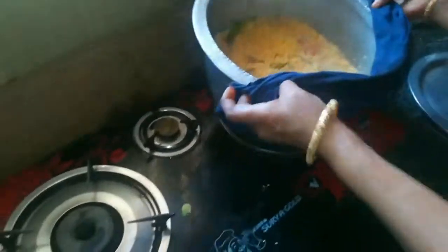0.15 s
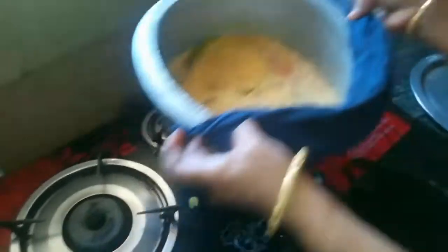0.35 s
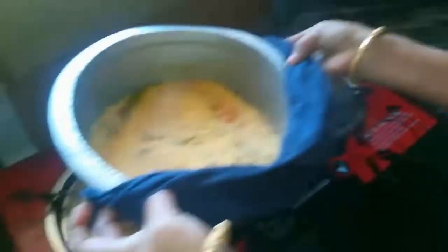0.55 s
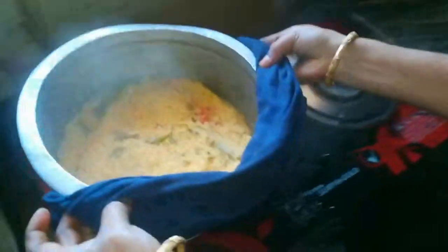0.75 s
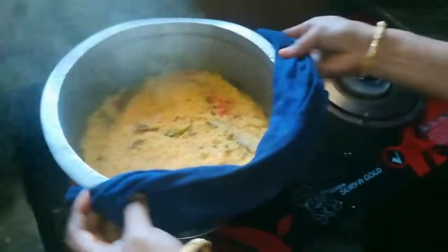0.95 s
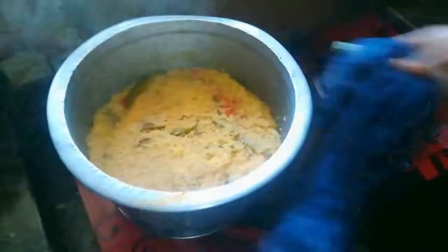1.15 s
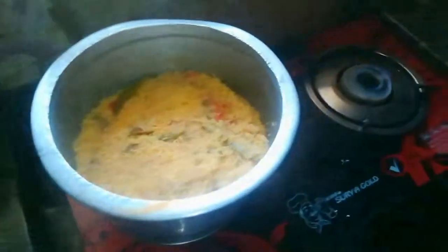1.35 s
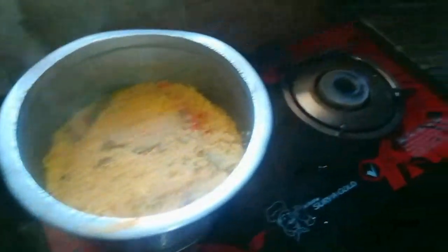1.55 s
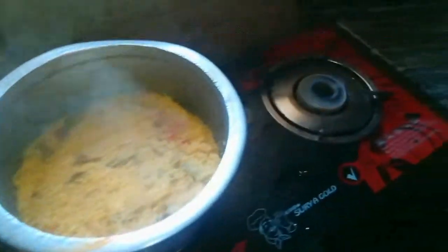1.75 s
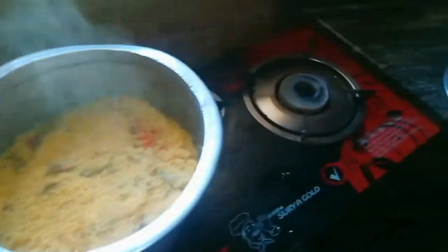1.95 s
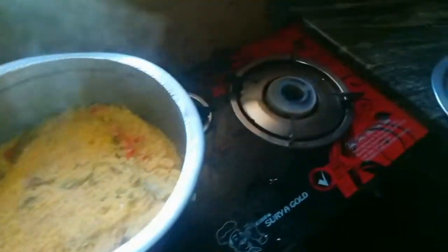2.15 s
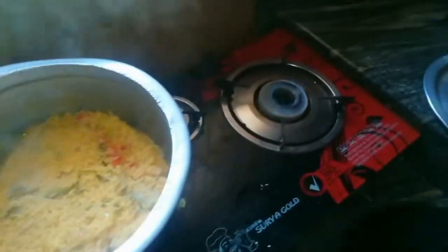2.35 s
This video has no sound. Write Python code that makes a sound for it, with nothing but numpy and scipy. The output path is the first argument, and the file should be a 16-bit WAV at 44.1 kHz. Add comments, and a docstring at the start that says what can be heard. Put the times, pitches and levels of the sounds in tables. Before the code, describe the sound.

Loud metallic clanks as a full metal pot leaves a gas burner, then a short squealing scrape

```python
"""Clanks: a full metal pot is lifted off a gas burner and the iron pan support drops back on the stove top.
Decaying sines ring the support and stove top; decaying noise bands give the crack and sheet-metal clatter.
The pot then slides onto the next burner: noise-driven resonators scrape, gliding sines squeal, low modes bump.
The kitchen is small and hard-walled (noise reverberation), with soft air noise and a low motor hum.
The loudest clanks overload the microphone (soft clipping)."""
import sys
import numpy as np
from scipy import signal
from scipy.fft import rfft, irfft
from scipy.io import wavfile

SR = 44100
rng = np.random.default_rng(int(sys.argv[2]) if len(sys.argv) > 2 else 0)


def transcribe(u):
    """Save the signal u as a 16-bit wav file named by the first command-line argument.

    u: samples, shape (n,) or (channels, n), limited to [-1, 1]; the rate is SR.
    q: integer samples, one column per channel.
    """
    v = np.clip(np.atleast_2d(u).T, -1, 1)
    q = np.round(v * 32767).astype(np.int16)
    wavfile.write(sys.argv[1], SR, q)


N = 110250
T = np.arange(N) / SR
EARS = np.array([[1], [-1]])  # left, right

# support strikes stove: t/s, clatter level/dB, extra bass/dB, extra treble/dB, support ring/dB, stove ring/dB
CLANKS = [(0.234, -9.5, -15, 2, -15, -16), (0.244, -6, -2, -1, -1, -7), (0.2907, -12, 0.5, 5.5, -20, -7.5),
          (0.301, -15.5, -4, -1, -2, -26), (0.432, -12.5, 5.5, 3, -22, -5),
          (0.588, -25.5, 5.5, -49, -23.5, -26)]
# grinding spectrum of the sliding contact: f/Hz, relative density/dB per Hz
GRIND = [(400, 2), (2100, -13.5), (3300, 2.5), (5400, 1), (7500, 0.5), (10200, -3.5), (12400, -21),
         (15500, -41)]
# stereo image: f/Hz, left-right likeness (-1 to 1), left-right level/dB
STEREO = [(102, .99, 0.5), (284, 0.96, -1), (580, 0, 0), (980, 0.6, 0), (2770, 0, -5.5), (4500, 0, -3.5),
          (8000, 0.078, -2), (14000, 0, 0.5)]

POT_T60_S = 0.067
JUDDER_DB, JUDDER_HZ = 1.5, 83  # rms and corner of the uneven friction
STOVE_ROOM_DB, SCRAPE_ROOM_DB = -13.5, -6.5


def from_db(db):
    """Decibels to gain."""
    return 10 ** (np.asarray(db) / 20)


def rms_one(x):
    """Scale to unit rms."""
    return x / np.sqrt(np.mean(x ** 2) + 1e-20)


def at_hz(table, hz, axis=1):
    """Read one column of a table on a log-frequency axis."""
    table = np.array(table)
    return np.interp(np.log(hz), np.log(table[:, 0]), table[:, axis])


def pan(db):
    """Left and right gains for a level difference."""
    return from_db(EARS * db / 2)


def decay(start_s, t60_s):
    """Unit step at start_s, falling 60 dB in t60_s."""
    return (T >= start_s) * np.exp(-np.log(1000) * np.maximum(T - start_s, 0) / t60_s)


def drift(corner_hz):
    """Random wander of unit rms, its spectrum falling above the corner."""
    spectrum = rfft(rng.standard_normal(N))
    rolloff = 1 + (np.fft.rfftfreq(N, 1 / SR) / corner_hz) ** 2
    return rms_one(irfft(spectrum / rolloff, N))


def ring(x, hz, t60_s):
    """Two-pole resonator: a unit click starts a decaying sine of height 1."""
    radius = np.exp(-np.log(1000) / (t60_s * SR))
    w = 2 * np.pi * hz / SR
    return signal.lfilter([0, np.sin(w)], [1, -2 * radius * np.cos(w), radius ** 2], x + 1e-18)


def butter(x, edges_hz, kind):
    """Second-order Butterworth filter."""
    return signal.sosfilt(signal.butter(2, edges_hz, kind, fs=SR, output="sos"), x)


def bands(spectrum, drive=1):
    """Driven stereo noise in narrow bands, as (Hz, band); a drive of 1 gives rms 1 in all."""
    edges_hz = np.geomspace(20, 16000, 28)
    centres_hz = np.sqrt(edges_hz[1:] * edges_hz[:-1])
    white = rng.standard_normal((2, 2, N)) * drive
    gains = from_db(at_hz(spectrum, centres_hz))
    gains = gains / np.sqrt(np.sum(gains ** 2 * np.diff(edges_hz)) * 2 / SR)
    for k, hz in enumerate(centres_hz):
        # neighbouring bands use different noise
        mid, side = butter(white[k % 2] + 1e-18, edges_hz[k:k + 2], "band")
        alike = np.clip(at_hz(STEREO, hz), -1, 1)
        stereo = np.sqrt((1 + alike) / 2) * mid + np.sqrt((1 - alike) / 2) * side * EARS
        yield hz, gains[k] * pan(at_hz(STEREO, hz, axis=2)) * stereo


def kitchen(x):
    """Dense wall reflections: decaying noise, alike in both ears only in the bass."""
    onset_s, t60_s = 0.0059, 0.35
    mid, side = rng.standard_normal((2, N)) * decay(onset_s, t60_s)
    side = butter(side, 450, "high")
    echoes = rms_one(mid + side * EARS) / np.sqrt(N)
    return signal.fftconvolve(x, echoes, axes=1)[:, :N]


def air():
    """Steady kitchen noise: random bands, each flickering in level."""
    # f/Hz, relative density/dB per Hz
    air_spectrum = [(25, -23), (45, 0), (65, -11.5), (110, 6), (160, -7.5), (250, -5), (400, -11.5),
                    (700, -15.5), (1300, -13.5), (2200, -17.5), (3500, -19.5), (6000, -26.5),
                    (10000, -35.5), (15000, -43.5)]
    level_db, flicker_db = -32.5, 1.57
    return from_db(level_db) * sum(band * from_db(flicker_db * drift(15)) for _, band in bands(air_spectrum))


def rushing_tones():
    """Faint narrow-band noise: slow random amplitudes on a cosine and a sine."""
    # f/Hz, drift corner/Hz, rms level/dB
    tones = [(105.9, 4.7, -37.5), (236.6, 25, -42), (1349, 25, -44.5)]
    out = 0
    for hz, width_hz, db in tones:
        in_phase = drift(width_hz) * np.cos(2 * np.pi * hz * T)
        quadrature = drift(width_hz) * np.sin(2 * np.pi * hz * T)
        out = out + from_db(db) * (in_phase + quadrature)
    return out


def motor_hum():
    """Lines of the motor and the mains, wavering in level and phase."""
    # f/Hz, rms level before waver/dB
    lines = [(45.8, -49), (91.5, -29.5), (100, -41.5)]
    waver_db, waver_rad = 2, 0.13
    out = 0
    for hz, db in lines:
        level = np.sqrt(2) * from_db(db + waver_db * drift(15.0))
        out = out + level * np.sin(2 * np.pi * hz * T + waver_rad * drift(9.2))
    return out


def background():
    """Soft rushing noise and the wavering hum of a motor."""
    return air() + rushing_tones() + motor_hum()


def bumps():
    """The loaded pot bumps on the burner: soft, heavy contacts wake only the low modes."""
    # t/s, click level before low-pass/dB
    contacts = [(0.433, -18.5), (0.589, -31), (1.752, -30), (2.085, -28.5), (2.266, -34.5)]
    # f/Hz, relative level/dB, t60/s
    low_modes = [(163, 0.5, 0.28), (226.2, 0, 0.4), (287, 4, 0.18), (452, -4.5, 0.38)]
    clicks = np.zeros(N)
    for start_s, db in contacts:
        clicks[int(start_s * SR)] = from_db(db)
    clicks = butter(clicks + 1e-18, 600, "low")
    out = pan(0) * sum(from_db(db) * ring(clicks, hz, t60_s) for hz, db, t60_s in low_modes)
    return out + from_db(STOVE_ROOM_DB) * kitchen(out)


def squeals():
    """Friction locks onto a pot mode: a sine swells fast, wavers in pitch and level, and rings out."""
    # t/s, length/s, f/Hz, rms level before judder/dB, left-right level/dB
    locked_modes = [(1.682, 0.035, 3330, -35, -15), (1.748, 0.028, 1667, -24.5, 12),
                    (1.745, 0.037, 7400, -31, 9), (1.744, 0.014, 9840, -35.5, 18),
                    (1.752, 0.1, 3450, -29.5, -5), (1.822, 0.0082, 4780, -24.5, -8),
                    (1.823, 0.097, 3380, -32, -4), (1.841, 0.077, 2787, -31.5, -9),
                    (1.858, 0.042, 3670, -25.5, -1), (1.866, 0.02, 4740, -24.5, -10),
                    (1.977, 0.04, 3257, -39, -3), (1.98, 0.018, 6740, -43, -9)]
    attack_s, t60_s = 0.0023, 0.083
    waver_ratio, waver_hz = 0.0035, 50
    out = 0
    for start_s, length_s, hz, db, pan_db in locked_modes:
        end_s = start_s + length_s
        attack = np.clip((T - start_s) / attack_s, 0, 1)
        envelope = attack * ((T < end_s) + decay(end_s, t60_s))
        phase = 2 * np.pi * np.cumsum(hz * (1 + waver_ratio * drift(waver_hz))) / SR
        level = np.sqrt(2) * from_db(db + JUDDER_DB * drift(JUDDER_HZ))
        out = out + pan(pan_db) * level * envelope * np.sin(phase)
    return out


def overtones(drive, count):
    """Many weak, close pot modes over the treble, driven by separate noise on each side."""
    spread_db = 6.5
    pitches_hz = np.linspace(2515, 14410, count)
    pitches_hz = pitches_hz + (pitches_hz[1] - pitches_hz[0]) * (rng.random(count) - .5)
    gains = from_db(at_hz(GRIND, pitches_hz) + spread_db * rng.uniform(-1.2, 1, count))
    gains = rms_one(gains) / np.sqrt(count)
    # offsets the resonators' gain
    shaken = drive * rng.standard_normal((2, N)) * np.sqrt(4 * np.log(1000) / (POT_T60_S * SR))
    return sum(gain * pan(at_hz(STEREO, hz, axis=2)) * ring(shaken, hz, POT_T60_S)
               for hz, gain in zip(pitches_hz, gains))


def rubbing_force():
    """Uneven rub of the sliding pot, plus hard catches of its base on the prongs."""
    # t/s, rub level before judder/dB
    rub = [(1.668, -33), (1.694, -21), (1.718, -19.5), (1.738, -27.5), (1.765, -20), (1.805, -25),
           (1.86, -17.5), (1.915, -21.5), (1.968, -26.5), (2.003, -20.5), (2.05, -47.5)]
    # t/s, level/dB
    catches = [(1.571, -30), (1.747, -15), (1.822, -12.5)]
    catch_t60_s = 0.061
    rub_db = np.interp(T, *np.transpose(rub), left=-np.inf, right=-np.inf)
    force = from_db(rub_db + JUDDER_DB * drift(JUDDER_HZ))
    return force + sum(from_db(db) * decay(start_s, catch_t60_s) for start_s, db in catches)


def pot_ring(force):
    """Friction noise drives the pot modes; each swells and fades on its own as the contact travels."""
    # f/Hz, relative level/dB, left-right level/dB
    pot_modes = [(927, -9.5, -2), (1240, -8, -2), (1665, -6, 3), (2200, -9, -3), (2850, -5, -9),
                 (3140, -6, -10), (3530, -3, -9), (3700, -4, -5), (4080, -8, -8), (4550, -7, -7),
                 (4900, -6, -7), (6760, -9, 0), (7090, -8, 0), (8820, -8, 2)]
    swell_db, swell_hz = 3, 22
    out = 0
    for hz, db, pan_db in pot_modes:
        rubbing = force * rng.standard_normal((2, N)) * 2 / np.sqrt(POT_T60_S * SR)
        swelling = from_db(db + swell_db * drift(swell_hz)) * rubbing
        out = out + pan(pan_db) * ring(swelling, hz, POT_T60_S)
    return out


def scrape():
    """The rubbing force sets the pot ringing over a faint grind, with squeals."""
    grind_db, overtones_db = -12, -7.5
    force = rubbing_force()
    out = from_db(grind_db) * sum(band for _, band in bands(GRIND, force))
    out = out + from_db(overtones_db) * overtones(force, count=72)
    out = out + squeals() + pot_ring(force)
    return out + from_db(SCRAPE_ROOM_DB) * kitchen(out)


def sheet_clatter():
    """Each clank is a short crack and a dense metallic ring that dies band by band."""
    # dense ring of the sheet metal: f/Hz, relative density/dB per Hz, t60/s
    sheet = [(60, -7.5, 0.18), (172, -9, 0.6), (308, -1, 0.22), (620, 0.5, 0.39), (970, -3, 0.35),
             (1510, -8.5, 0.41), (2290, -12.5, 0.38), (3250, -7.5, 0.36), (5240, -16, 0.36),
             (7960, -28, 0.43), (11000, -36.5, 0.32), (15000, -42, .3)]
    level_db, crack_db, crack_t60_s = 1, -0.5, 0.043
    bass_hz, treble_hz = 345, 1990
    out = 0
    for hz, band in bands(sheet):
        bass = 1 / (1 + (hz / bass_hz) ** 2)
        treble = 1 / (1 + (treble_hz / hz) ** 2)
        blow_power = np.zeros(N)
        for start_s, db, bass_db, treble_db, _, _ in CLANKS:
            blow_power[int(start_s * SR)] = from_db(db + bass * bass_db + treble * treble_db) ** 2
        power = 0
        for gain, t60_s in ((1, at_hz(sheet, hz, axis=2)), (from_db(crack_db) * treble, crack_t60_s)):
            pole = np.exp(-2 * np.log(1000) / (t60_s * SR))
            power = power + gain ** 2 * signal.lfilter([1], [1, -pole], blow_power + 1e-18)
        out = out + band * np.sqrt(power)
    return from_db(level_db) * butter(out, 45, "high")


def struck_modes(modes, strike_db):
    """Every blow adds energy to each mode; a mode reaches the two ears out of step."""
    attack_s = 0.0021
    waver_rad, waver_hz = 0.72, 8.8  # the loose support shifts as it rings
    ear_rad, ear_corner_hz = 0.48, 338  # treble limit of the phase offset in each ear
    pivot_hz, tilt_per_octave = 710, 0.52  # a blow's extra bass also tips the mode balance
    starts_s, extra_bass_db = np.transpose(CLANKS)[[0, 2]]
    out = 0
    for hz, mode_db, ring_s, pan_db in modes:
        tilt_db = extra_bass_db * tilt_per_octave * np.clip(np.log2(pivot_hz / hz), -.5, 1)
        strengths = from_db(strike_db + mode_db + tilt_db)
        energy = 0
        for start_s, strength in zip(starts_s, strengths):
            rise = np.clip((T - start_s) / attack_s, 0, 1)
            energy = energy + (strength * rise * decay(start_s, 0.85 * ring_s)) ** 2
        offset = rng.choice([-1, 1]) * ear_rad / (1 + (ear_corner_hz / hz) ** 2)
        phase = 2 * np.pi * (hz * T + rng.random()) + offset * EARS + waver_rad * drift(waver_hz)
        out = out + pan(pan_db) * np.sqrt(energy) * np.sin(phase)
    return out


def pot_knock():
    """The pot's base knocks a prong once as it leaves: two decaying sines."""
    start_s = 0.241
    out = 0
    for hz, db, t60_s, pan_db in ((725, -11, 0.21, 3), (856, -9, 0.18, 8)):
        out = out + pan(pan_db) * from_db(db) * decay(start_s, t60_s) * np.sin(2 * np.pi * hz * (T - start_s))
    return out


def frame_thuds():
    """The stove's frame gives a low thud under the blows: decaying sines."""
    hz, t60_s = 103.5, 0.22
    out = 0
    for start_s, db in ((0.2318, -12.5), (0.434, -24)):
        out = out + from_db(db) * decay(start_s, t60_s) * np.sin(2 * np.pi * hz * (T - start_s))
    return out


def stove_ring():
    """Support and stove top ring with each clank, the pot knocks, and the frame thuds."""
    # both: f/Hz, relative level/dB, ring time/s (t60 is 0.85 of it), left-right level/dB
    support_modes = [(222.7, -5, 0.31, -1.5), (288.7, -12.5, 0.45, 3), (338.7, -7.5, 0.42, 2),
                     (403, -15, 0.71, -4), (474.7, -3.5, 0.346, 10), (549.5, -10, 0.39, -2),
                     (722, -11.5, 0.23, -15), (831, -7.5, 0.19, 8), (1042, -10, 0.22, -3)]
    stove_modes = [(237.8, -9.5, 0.24, 2.5), (581, -4.5, 0.15, -8), (954, -0.5, 0.076, -7.5),
                   (1087, -15, 0.48, 3), (1743, -12, 0.07, 22)]
    modes_db = -2
    support_db, stove_db = np.transpose(CLANKS)[-2:]
    ringing = struck_modes(support_modes, support_db) + struck_modes(stove_modes, stove_db)
    out = from_db(modes_db) * ringing + pot_knock()
    return out + frame_thuds() + from_db(STOVE_ROOM_DB) * kitchen(out)


def scene():
    """The kitchen, the slide and the clanks."""
    return background() + bumps() + scrape() + sheet_clatter() + stove_ring()


def record(dry):
    """Peaks overload softly towards 1; the top is cut, 60 dB down from 15.8 kHz."""
    clipped = dry / (1 + dry ** 8) ** (1 / 8)
    return signal.sosfilt(signal.cheby2(14, 60, 15800, fs=SR, output="sos"), clipped)


dry = scene()
out = record(dry)
transcribe(out)
```